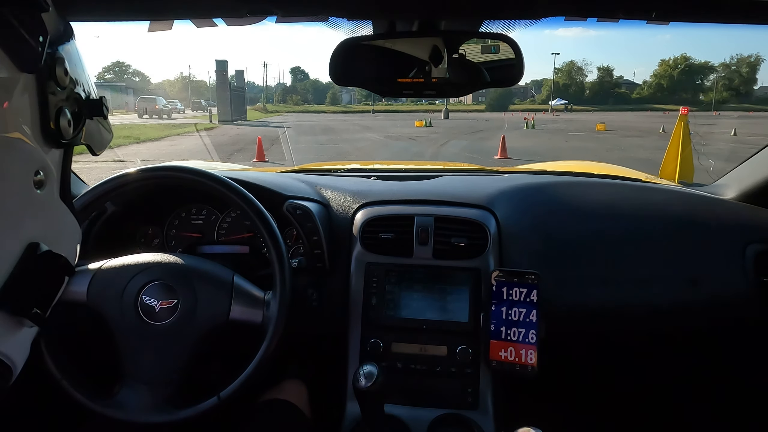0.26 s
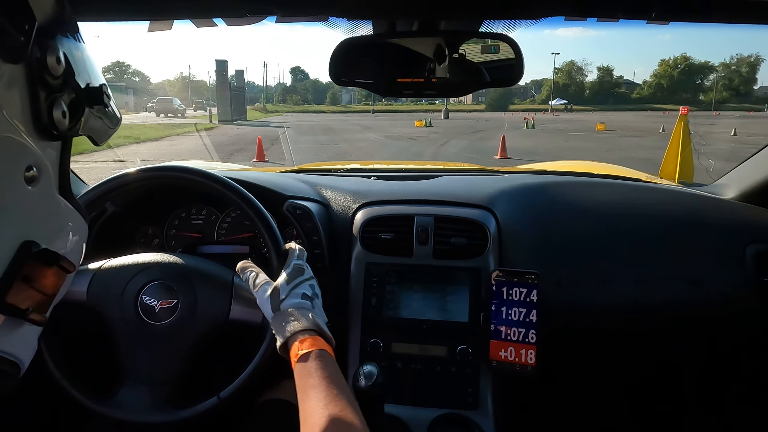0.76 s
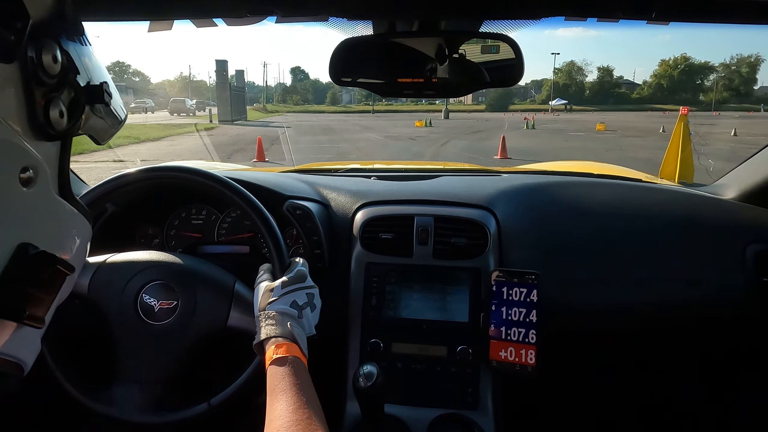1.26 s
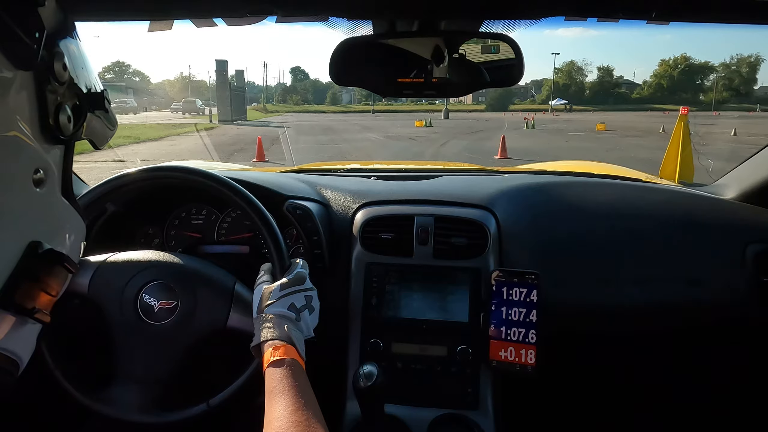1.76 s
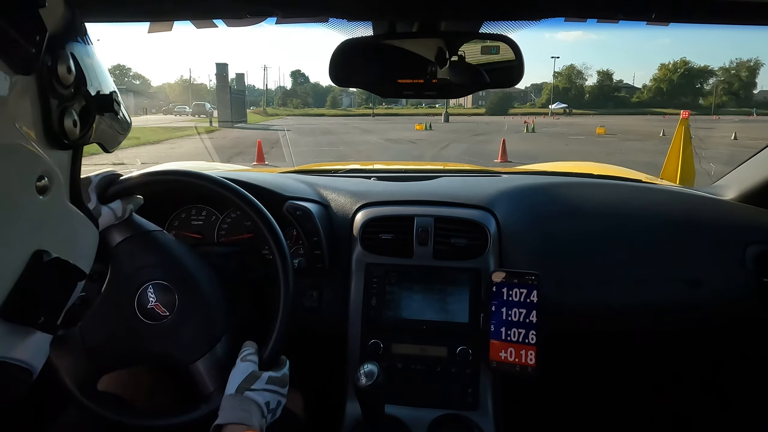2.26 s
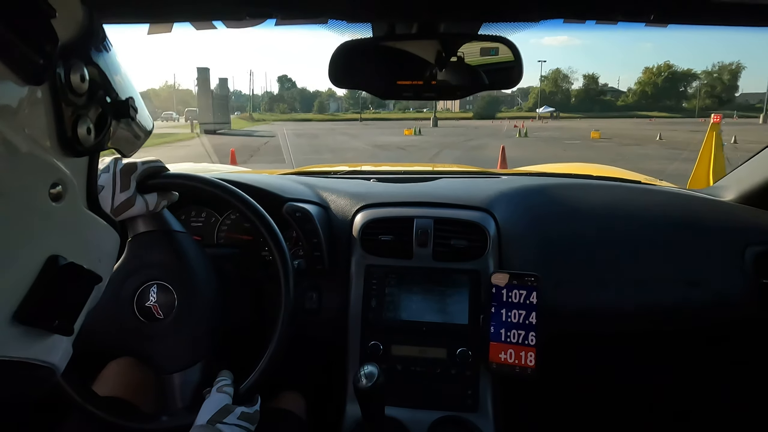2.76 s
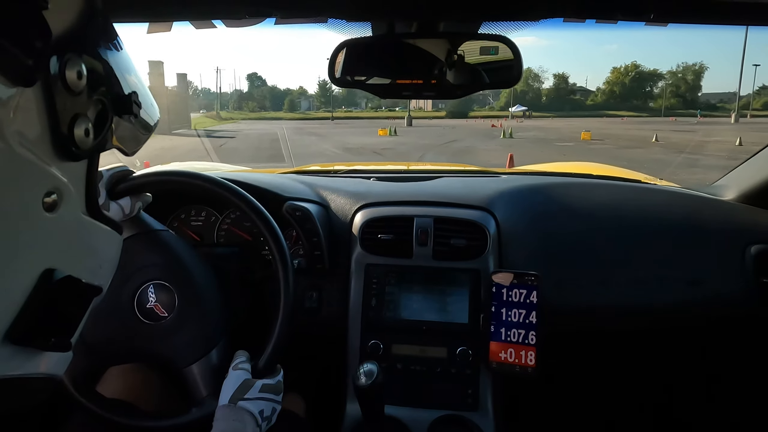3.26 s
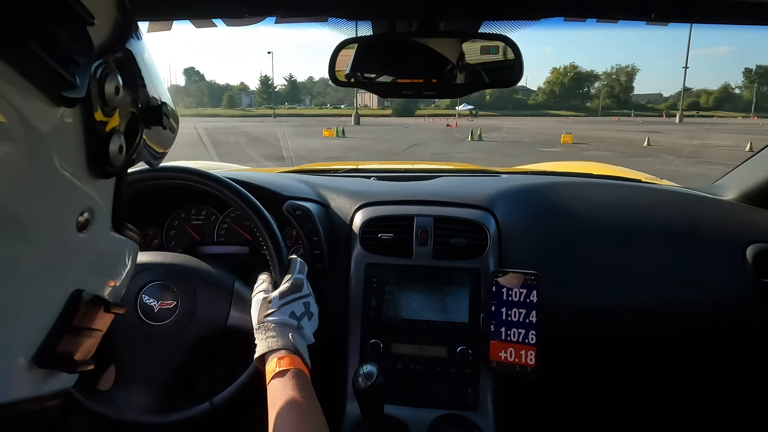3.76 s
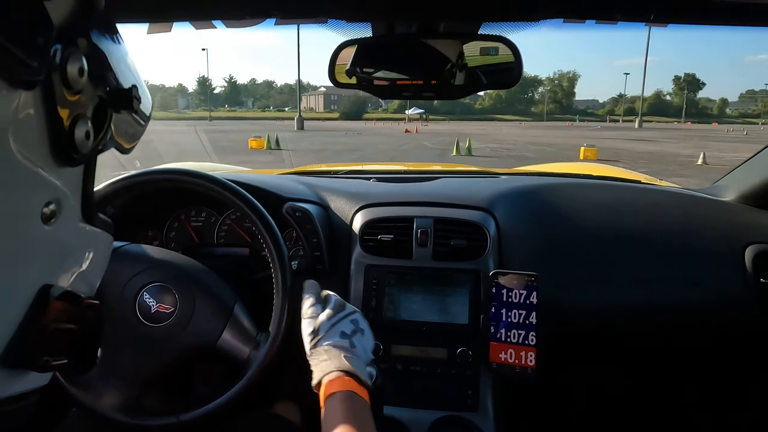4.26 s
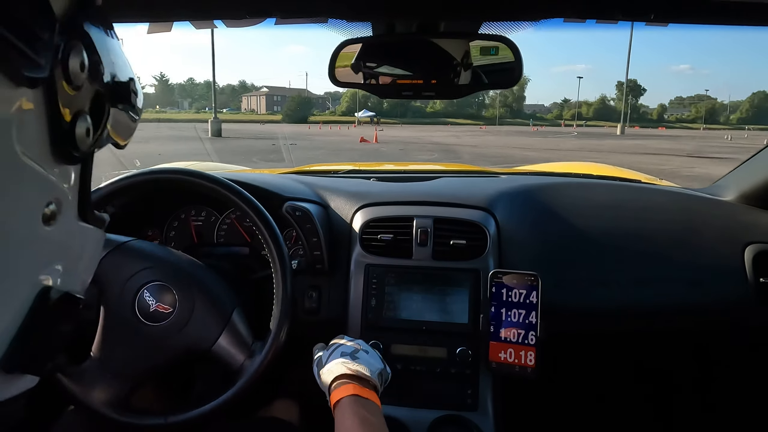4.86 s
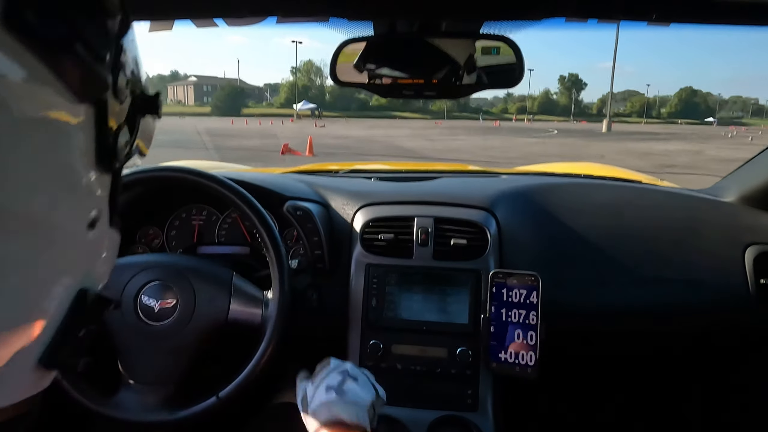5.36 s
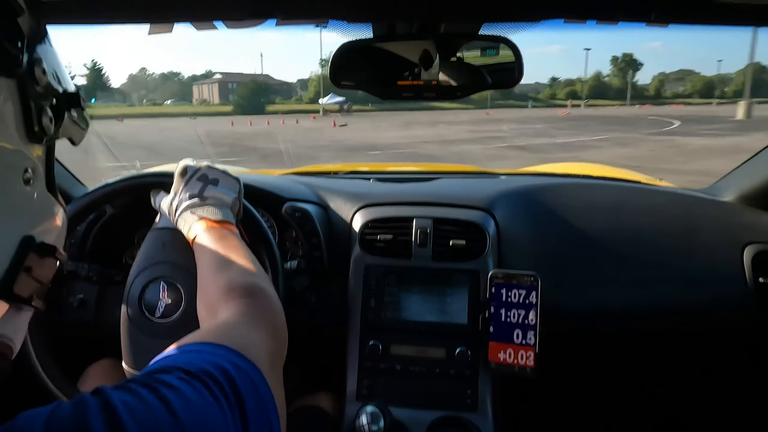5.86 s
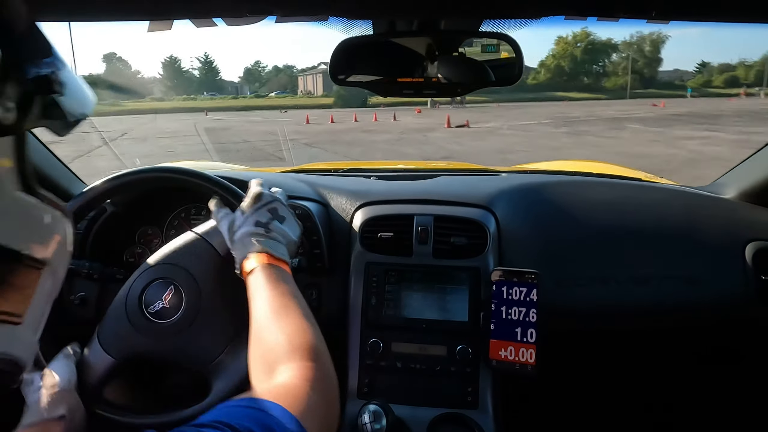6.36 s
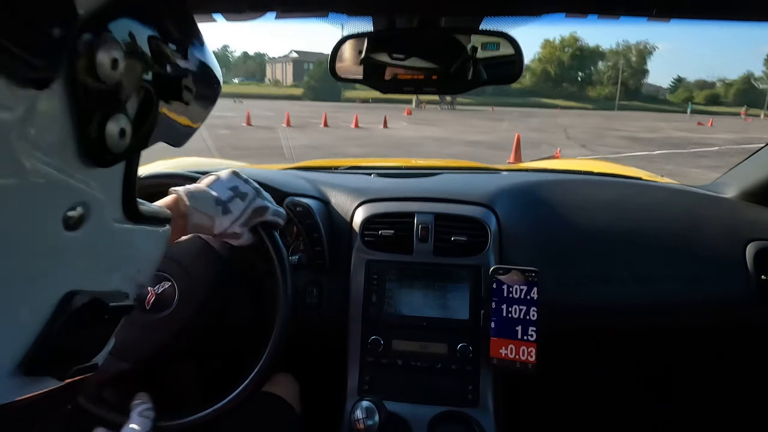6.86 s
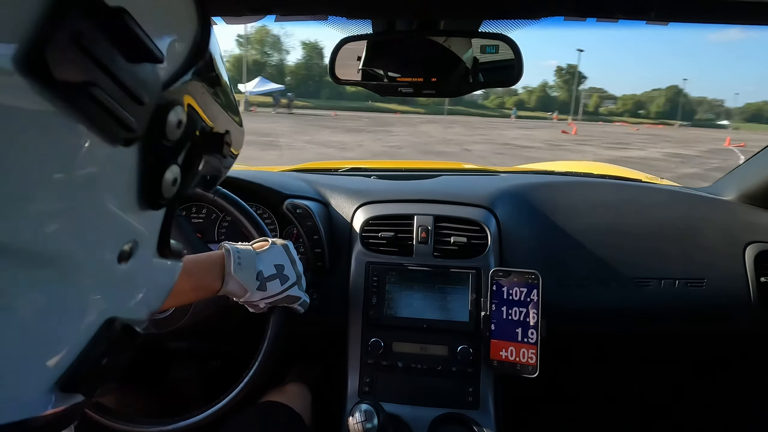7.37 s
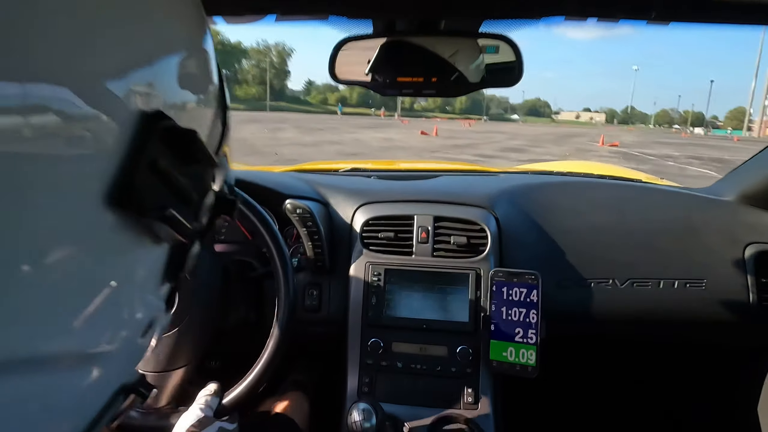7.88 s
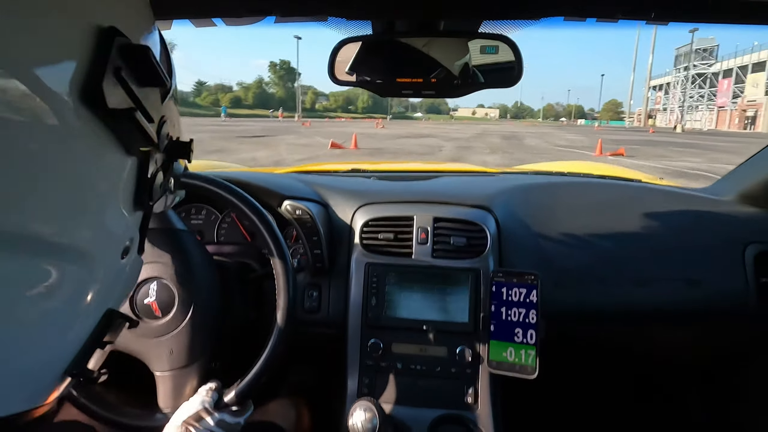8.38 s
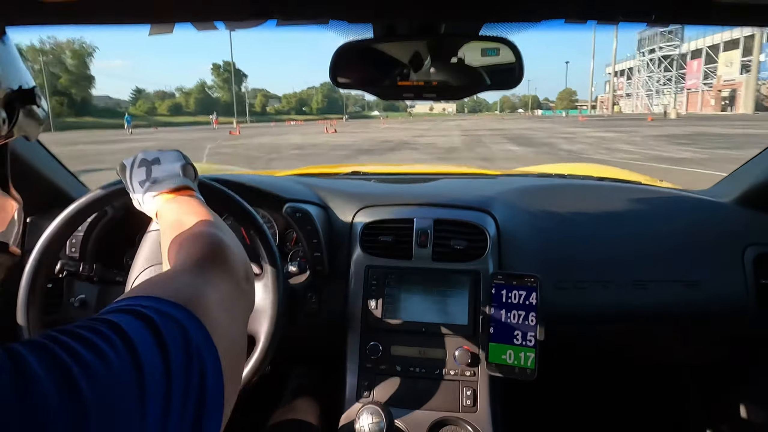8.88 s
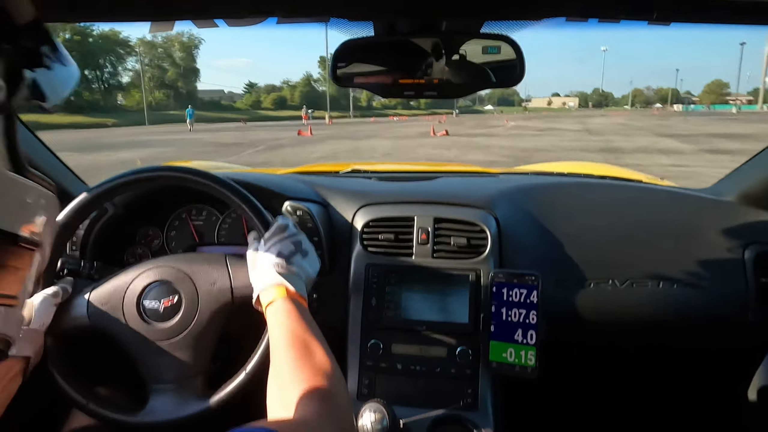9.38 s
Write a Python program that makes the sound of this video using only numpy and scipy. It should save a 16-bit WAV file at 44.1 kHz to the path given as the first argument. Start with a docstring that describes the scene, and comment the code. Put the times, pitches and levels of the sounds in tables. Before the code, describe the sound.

Heard from the driver's seat with the windows down, a V8 sports car holds steady revs, then launches. The engine bogs briefly, the tyres scrub and chirp, and the revs climb with a booming exhaust and rasping intake. The throttle snaps shut and the car coasts through a turn with thuds, ticking trim and a short squeal. The tyres scrub again as the engine pulls once more. Wind buffets the microphone throughout.

```python
"""A V8 sports car on an autocross course; stereo microphone at the driver's seat, windows down.
Wind buffets it throughout. The engine is held at launch speed until the clutch bites at 2.1 s: the
revs bog, the tyres scrub, then chirp as the car pulls up through first gear, exhaust booming and
intake rasping. At 5.4 s the throttle snaps shut and the car coasts through a turn, with chassis jolts,
ticking trim and a brief squeal. From 7.4 s the tyres scrub again and the engine pulls once more."""
import sys
import numpy as np
from scipy.fft import rfft, irfft, next_fast_len
from scipy.io import wavfile
from scipy.ndimage import map_coordinates

SR = 44100
rng = np.random.default_rng(int(sys.argv[2]) if len(sys.argv) > 2 else 0)


def dump(signal):
    """Clip the signal to [-1, 1] and save it as 16-bit WAV at the path in sys.argv[1]."""
    limited = np.clip(np.atleast_2d(signal).T, -1, 1)
    pcm = np.round(limited * 32767).astype(np.int16)
    wavfile.write(sys.argv[1], SR, pcm)


N = 424683
TIME_S = np.arange(N) / SR
LAUNCH_S = 2.14  # the clutch bites


def amp(db):
    """Decibels to gain."""
    return 10 ** (np.asarray(db) / 20)


def unit(x):
    """Scaled to rms 1."""
    return x / np.sqrt(np.mean(x ** 2) + 1e-20)


def along(points, hz):
    """Read (frequency_hz, value) points on a log axis."""
    knots_hz, values = np.transpose(points)
    return np.interp(np.log(hz + 1), np.log(knots_hz + 1), values)


def curve(points):
    """Join (time_s, value) points into one value per sample."""
    return np.interp(TIME_S, *np.transpose(points))


def wobble(rate_hz):
    """A smooth random curve, rate_hz knots a second."""
    knots = rng.standard_normal(int(N * rate_hz / SR) + 4)
    return map_coordinates(knots, [TIME_S * rate_hz])


def noise():
    """Two unrelated white noises."""
    return rng.standard_normal((2, N))


def filtered(x, response):
    """x times a response of frequency."""
    size = next_fast_len(N + SR // 4)
    return irfft(rfft(x, size) * response(np.fft.rfftfreq(size, 1 / SR)), size)[..., :N]


def coloured(x, spectrum, modes=()):
    """x through a broad spectrum with resonant humps, at rms 1."""
    def response(hz):
        humps_db = sum(db * np.exp(-.5 * ((hz - centre) / width) ** 2) for centre, width, db in modes)
        return amp(along(spectrum, hz) + humps_db)
    return unit(filtered(x, response))


def swells(rows, attack_s, fall_db_per_s):
    """An envelope: each row rises, holds to the end of its length and dies away."""
    envelope = np.zeros(N)
    for start_s, length_s, level_db in rows:
        rise = np.clip((TIME_S - start_s) / attack_s, 0, 1)
        envelope += rise * amp(level_db - fall_db_per_s * np.maximum(TIME_S - start_s - length_s, 0))
    return envelope


def knocks(rows, attack_s):
    """An envelope: each row jumps up and dies away at once."""
    envelope = np.zeros(N)
    for start_s, level_db, t60_s in rows:
        age_s = np.maximum(TIME_S - start_s, 0)
        envelope += amp(level_db - 60 * np.minimum(age_s / t60_s, 2)) * (1 - np.exp(-age_s / attack_s))
    return envelope


def since_launch(ramp_s=.43):
    """0 at the start line, 1 from ramp_s after the clutch bites; by default, once the car rolls."""
    return np.clip((TIME_S - LAUNCH_S) / ramp_s, 0, 1)


def whine(pitch_hz=1405, level_db=-46, drift=.0097, waver_db=3):
    """A faint wavering whine from up ahead, under the bonnet."""
    wavering_hz = pitch_hz * (1 + drift * (wobble(1.7) + .5 * wobble(60)))
    return amp(level_db + waver_db * wobble(11)) * np.sin(2 * np.pi * np.cumsum(wavering_hz) / SR)


# Spectrum of wind right on the microphone: frequency_hz, gain_db
WIND_SPECTRUM = [(4, -6), (10, 0), (25, -3), (50, -9), (100, -18), (200, -29), (400, -45), (1000, -80)]

def wind(standing_db=-21, moving_db=-20, gust_db=2.5, opposed=.11):
    """Eddies from the open windows hit each microphone port separately, partly in opposite sense."""
    level_db = standing_db + (moving_db - standing_db) * since_launch()
    eddies = amp(gust_db * np.array([wobble(11), wobble(14)])) * coloured(noise(), WIND_SPECTRUM)
    return amp(level_db) * unit(eddies - opposed * eddies[::-1])


# Spectrum of the engine bay, from the seat at the start line: frequency_hz, gain_db
BAY_SPECTRUM = [(130, -38), (220, -4), (293, -6), (357, -9), (404, -4.5), (458, -17.5), (483, -9),
                (667, -5), (1010, -10), (1410, -6.5), (1720, -11.5), (1980, -18.5), (2370, -14),
                (8450, -36), (15800, -51.5)]
# Spectrum of the tyres rolling below the cabin: frequency_hz, gain_db
ROLLING_SPECTRUM = [(80, -36), (160, -17), (260, -16), (350, -14), (500, -14), (750, -11.5), (1470, -13.5),
                    (2000, -21), (3500, -26), (5000, -37.5), (9000, -46), (15800, -58)]
# Resonances of the cabin around the microphone: centre_hz, width_hz, lift_db
CABIN_MODES = [(670, 38, 6.1), (898, 53, 2.8), (1390, 35, 2.8), (1713, 14, 6), (2250, 110, 0.92)]

def bay_and_tyre_roar(breath, throttle, bay_db=-34.5, tyre_db=-33.5, load_db=5.5, clatter=.17):
    """Engine-bay clatter gives way to tyre roar as the car moves off; both ring the cabin."""
    bay = amp(bay_db) * coloured(noise() * (1 + clatter * breath), BAY_SPECTRUM, CABIN_MODES)
    tyres = coloured(noise(), ROLLING_SPECTRUM, CABIN_MODES) * amp(tyre_db + 1.4 * wobble(14))
    load = np.minimum(throttle / .41, 1)  # no louder beyond part throttle
    moving = since_launch()
    return amp(load_db * load) * (np.sqrt(1 - moving) * bay + np.sqrt(moving) * tyres)


# Ticks of loose trim, close by in the cabin: start_s, level_db, t60_s
TRIM_TICKS = [(6.085, -47, 0.09), (6.12, -39, .08), (6.15, -46, 0.089), (6.425, -39, 0.13), (6.5, -40, 0.1),
              (6.64, -34, .09), (6.675, -38, 0.13), (6.708, -36, 0.15), (6.78, -43, 0.14), (7.06, -48, .08),
              (7.312, -31.5, 0.066), (7.455, -43, 0.069)]
# Spectrum of a tick: frequency_hz, gain_db
TICK_SPECTRUM = [(2000, 10), (5500, 3), (8000, -2), (11000, -1), (15000, -6)]

def trim_ticks():
    """Loose trim rattles in the turn."""
    return knocks(TRIM_TICKS, attack_s=.002) * coloured(noise(), TICK_SPECTRUM)


# Jolts from under the seat: start_s, level_db, t60_s
CHASSIS_JOLTS = [(5.43, -18, .2), (5.68, -14, .2), (6.02, -19, .3), (6.705, -5, 0.29), (7.28, -13.5, 0.34)]
# Spectrum of a jolt: frequency_hz, gain_db
JOLT_SPECTRUM = [(10, 2), (25, 5.5), (45, -6), (90, -19), (200, -17.5), (400, -26), (1200, -70)]

def chassis_jolts():
    """The chassis thuds on the lift and over seams in the course."""
    return knocks(CHASSIS_JOLTS, attack_s=.0033) * coloured(noise(), JOLT_SPECTRUM)


# Slips of the driven tyres, outside the cabin: start_s, length_s, level_db
TYRE_SCRUBS = [(2.21, 0.61, -23), (7.48, 0.41, -22.5)]
# Spectrum of slipping tread: frequency_hz, gain_db
SCRUB_SPECTRUM = [(100, -2.5), (220, 6.5), (330, -3.5), (470, -8.5), (650, 0.5), (950, 1), (1500, -1.5),
                  (2000, -29), (2600, -8.5), (4000, -13), (5000, -22), (12000, -42)]

def tyre_scrub(grit_db=2.5):
    """Tread grinds over the asphalt as the power comes in."""
    envelope = swells(TYRE_SCRUBS, attack_s=.12, fall_db_per_s=74)
    return envelope * amp(grit_db * wobble(250)) * coloured(noise(), SCRUB_SPECTRUM)


# Squeals through the open windows: start_s, length_s, start_hz, end_hz, level_db, octave_db, roughness
TYRE_SQUEALS = [(3.002, .032, 2170, 2090, -14.5, -24, .18), (3.068, .025, 2560, 2680, -27, -24, .5),
                (6.84, .135, 1305, 1260, -27, -17, .9), (6.914, .032, 1275, 1275, -22, -17, .5)]

def tyre_squeals(stray=.08, stutter_db=3.5):
    """Tread sticks and slips at an unsteady pitch."""
    out = np.zeros(N)
    drift, stutter = wobble(420), wobble(200)
    for start_s, length_s, start_hz, end_hz, level_db, octave_db, roughness in TYRE_SQUEALS:
        progress = np.clip((TIME_S - start_s) / length_s, 0, 1)
        pitch_hz = (start_hz + (end_hz - start_hz) * progress) * (1 + stray * roughness * drift)
        phase = 2 * np.pi * np.cumsum(pitch_hz) / SR
        tone = np.sin(phase) + amp(octave_db) * np.sin(2 * phase)
        swell = np.sqrt(2 * np.abs(np.sin(np.pi * progress)))
        out += amp(level_db + stutter_db * roughness * stutter) * swell * tone
    return out


# Resonances of the shut intake, ahead of the seat: centre_hz, width_hz, lift_db
SHUT_INTAKE_MODES = [(690, 55, 19.5), (1666, 32, 11.5), (2820, 320, 4.5)]
# Spells of chatter at the throttle: start_s, length_s, level_db
THROTTLE_FLUTTERS = [(5.35, 0.086, -26.5), (5.53, 0.15, -23.5)]
# Spectrum of the chatter: frequency_hz, gain_db
FLUTTER_SPECTRUM = [(300, -6), (560, -13), (1300, -5), (2700, -13), (4000, -16), (6000, -32), (15000, -54)]

def throttle_flutter(breath, rough_db=1.3):
    """On the lift, trapped air chatters against the shut throttle."""
    envelope = swells(THROTTLE_FLUTTERS, attack_s=.072, fall_db_per_s=150) * amp(rough_db * wobble(160))
    return envelope * coloured(noise() * breath, FLUTTER_SPECTRUM, SHUT_INTAKE_MODES)


# Snaps from under the bonnet after the lift: start_s, level_db, t60_s
OVERRUN_SNAPS = [(5.387, -22, 0.013), (5.427, -18, 0.018), (5.506, -6, 0.012), (5.514, -15, 0.038),
                 (5.679, -23, .012), (5.778, -28, .015), (6.557, -30, 0.026)]
# Spectrum of a snap: frequency_hz, gain_db
SNAP_SPECTRUM = [(300, -15), (700, -2), (2200, 4), (2900, 2), (4500, -4), (5600, -6), (8000, -18),
                 (15000, -34)]

def overrun_snaps():
    """Sharp knocks on the overrun ring the shut intake."""
    return knocks(OVERRUN_SNAPS, attack_s=.00066) * coloured(noise(), SNAP_SPECTRUM, SHUT_INTAKE_MODES)


# Each cylinder's gulp of air, in firing order: strength_db, runner_lag_s
CYLINDERS = [(4, 0.0025), (-5, 0), (-4.5, 0), (-5.5, 0), (2, 0.0025), (-13, 0), (-7, 0.001), (-3, 0)]

def gulps(cycle, firing_hz, fade_per_stroke=1.8, scatter_db=1, steady_flow=.5):
    """The airflow envelope: each intake valve opens with a rush that fades; some cylinders gulp more."""
    stroke, age = np.divmod(cycle * len(CYLINDERS), 1)
    stroke = stroke.astype(int)
    strength_db, lag_s = np.array(CYLINDERS)[stroke % len(CYLINDERS)].T
    size = amp(strength_db + scatter_db * rng.standard_normal(stroke[-1] + 1)[stroke])
    age = age - lag_s * firing_hz
    return unit(steady_flow + size * np.exp(-fade_per_stroke * np.abs(age)) * (age > 0))


def valve_pulses(cycle, jitter_s=.00005, scatter_db=1):
    """One pressure pulse per valve opening, each a little early or late."""
    count = len(CYLINDERS)
    strokes = np.arange(1, int(cycle[-1] * count))
    strength_db, lag_s = np.array(CYLINDERS)[strokes % count].T
    time_error, size_error = rng.standard_normal((len(strokes), 2)).T
    times_s = np.interp(strokes / count, cycle, TIME_S) + lag_s + jitter_s * time_error
    sizes = amp(.5 * strength_db + scatter_db * size_error)
    return unit(np.bincount(np.abs(times_s * SR).astype(int), sizes, N)[:N])


def ducted(x, smear_rad=3, knot_hz=260):
    """The duct holds some frequencies longer than others, smearing each pulse into a short rattle."""
    knots = rng.standard_normal(int(SR / knot_hz) + 4)
    return filtered(x, lambda hz: np.exp(1j * smear_rad * map_coordinates(knots, [hz / knot_hz])))


# Spectrum of the intake rasp at the seat: frequency_hz, gain_db
RASP_SPECTRUM = [(150, -57), (300, -13.5), (400, -3.5), (490, -12.5), (620, -4.5), (1250, -1), (1480, -5.5),
                 (2200, -5.5), (3000, -3), (4000, -7.5), (4800, -26), (6500, -51), (9000, -59)]
# Airbox resonances early and late in a pull: early_hz, late_hz, width_hz, lift_db
AIRBOX_MODES = [(685, 700, 36, 7), (1000, 1020, 164, 5.5), (1748, 1914, 133, 13), (1732, 1793, 33, 4),
                (2525, 2746, 188, 5.5), (2507, 2560, 48, 4.5), (3600, 3400, 90, 0), (4350, 4450, 69, 7.5)]
# Blend from the early resonances to the late: time_s, late_share
AIRBOX_BLEND = [(2.3, 0.14), (3.7, 0.06), (4.4, 0.63), (5.2, 0.85), (7.5, 0.17), (8.0, 0.3), (8.6, 0.8),
                (9.6, 0.6)]

def airbox(air):
    """Air rings the airbox; most of its resonances sit higher late in a pull."""
    early = coloured(air, RASP_SPECTRUM, [(hz, width, db) for hz, _, width, db in AIRBOX_MODES])
    late = coloured(air, RASP_SPECTRUM, [(hz, width, db) for _, hz, width, db in AIRBOX_MODES])
    late_share = curve(AIRBOX_BLEND)
    return unit((1 - late_share) * early + late_share * late)


# Spectrum of the intake hiss at the seat: frequency_hz, gain_db
HISS_SPECTRUM = [(2500, -25), (3800, 0), (4800, -0.5), (5700, 3), (7000, -5), (9000, -12), (11000, -9.5),
                 (13000, -14.5), (15800, -27)]
MIDDLE_REVS_HZ, HIGH_REVS_HZ = 220, 296  # firing rates

def intake(cycle, firing_hz, throttle, pulse_top_hz=1700, spit_s=.001):
    """Valve pulses and turbulent gulps of air rasp and hiss under load, harder at high revs."""
    revs = np.clip((firing_hz - 215) / 115, 0, 1)
    lowpass = lambda hz: 1 / np.sqrt(1 + (hz / pulse_top_hz) ** 4)
    breath = gulps(cycle, firing_hz)
    cycle_age_s = (cycle % 1) * len(CYLINDERS) / firing_hz
    spit = np.exp(-cycle_age_s / spit_s)  # once a cycle, from the strongest cylinder
    spitting = unit(breath + 2 * revs * spit)
    turbulence = spitting * filtered(noise(), lambda hz: np.sqrt(1 - .6 * lowpass(hz) ** 2))
    pulses = amp(4 * (revs - 1)) * filtered(ducted(valve_pulses(cycle)), lowpass)
    rasp = airbox(turbulence + np.array([pulses, np.zeros(N)]))  # pulses join the direct sound only
    hiss = coloured((breath + spitting) * noise(), HISS_SPECTRUM)
    open_rasp_db = -18.5 + .008 * np.maximum(firing_hz - MIDDLE_REVS_HZ, 0)
    open_hiss_db = -37 + .0952 * np.maximum(firing_hz - 254, 0)
    return amp(open_rasp_db) * throttle ** 2.75 * rasp + amp(open_hiss_db) * throttle ** 3.7 * hiss


def engine_order(cycle, order, port_lag_rad=.81):
    """A sine at a multiple of the engine cycle, reaching the two microphone ports out of step."""
    phase = 2 * np.pi * (order * cycle + rng.random())
    return np.sqrt(2) * np.sin(phase + port_lag_rad * np.array([[.5], [-.5]]))


# Exhaust orders 1, 2, ... of the engine cycle, scaled to full throttle: held_db, middle_db, high_db
LOPE_ORDERS = [(-50, -45, -44), (-39, -32.5, -23), (-22.5, -33.5, -32), (-21, -29.5, -24.5),
               (-29, -29, -28), (-16, -31.5, -30.5), (-35, -32, -38), (-39, -53, -48), (-33, -48, -55),
               (-30, -35, -44.5), (-41, -41, -59)]

def exhaust_lope(cycle, firing_hz, throttle, waver_db=2.5, leak=.04):
    """The unevenly firing banks lope; the pattern shifts as the clutch takes up and with the revs."""
    engaged = since_launch(ramp_s=.08)
    revs = np.clip((firing_hz - MIDDLE_REVS_HZ) / (HIGH_REVS_HZ - MIDDLE_REVS_HZ), 0, 1)
    lope = 0
    for order, (held_db, middle_db, high_db) in enumerate(LOPE_ORDERS, 1):
        driving_db = middle_db + (high_db - middle_db) * revs
        level_db = (1 - engaged) * held_db + engaged * driving_db
        gain = amp(level_db + waver_db * np.array([wobble(6), wobble(6)]))
        lope += gain * engine_order(cycle, order, port_lag_rad=1)
    return (throttle + leak) ** .53 * lope


# The firing tone at the seat, under full load: firing_hz, level_db
BOOM_LEVELS = [(120, -17), (152, -15.5), (199, -18), (218, -21.5), (238, -23), (292, -19.5), (312, -22.5),
               (336, -28), (372, -26.5)]

def exhaust_boom(cycle, firing_hz, throttle, waver_db=1, leak=.015):
    """The firing tone booms and fades as it sweeps through the pipe and cabin resonances."""
    load = np.minimum(throttle / .59, 1) + leak  # all but gone on the overrun
    level_db = along(BOOM_LEVELS, firing_hz) + waver_db * wobble(20)
    return load * amp(level_db) * engine_order(cycle, len(CYLINDERS))


# Moments when the exhaust barks out: start_s, length_s, level_db
EXHAUST_BARKS = [(4.87, 0.34, -31), (7.53, 0.12, -24.5), (7.88, 0.13, -32)]

def exhaust_bark(cycle, throttle, open_db=-43, rough_db=2, step_db=4):
    """Rough harmonics 2 to 4 of the firing tone grow with the throttle and flare briefly."""
    overtones = 0
    for harmonic in (2, 3, 4):
        gain = amp(rough_db * wobble(70) - step_db * (harmonic - 2))
        overtones += gain * engine_order(cycle, harmonic * len(CYLINDERS))
    flares = swells(EXHAUST_BARKS, attack_s=.091, fall_db_per_s=160)
    return (amp(open_db) * throttle ** .2 + flares) * overtones


# Reflected against direct sound at the seat: frequency_hz, side_to_mid_db
CABIN_WIDTH = [(100, -8), (300, -4.5), (1000, -8), (2000, -11.5), (4000, -9), (8000, -1), (13000, 1)]

def in_cabin(pair):
    """Direct and reflected sound to left and right: the treble is the more diffuse."""
    direct, reflected = pair
    side = filtered(reflected, lambda hz: amp(along(CABIN_WIDTH, hz)))
    return np.array([direct + side, direct - side])


# Revs held at the start line: time_s, firing_hz
HELD_REVS = [(0, 137), (.6, 141.6), (.85, 137.8), (1.5, 148.1), (1.9, 153.2), (2.25, 155.5)]
# Revs bog as the clutch bites, then climb: time_s, firing_hz
FIRST_PULL_REVS = [(2.39, 121), (2.55, 144), (2.8, 191.6), (3, 215), (3.12, 222), (3.3, 219), (3.5, 226),
                   (3.85, 264), (4.18, 270.5), (4.35, 284.7), (4.6, 313), (4.8, 312), (5, 335), (5.35, 388)]
# Revs coasting through the turn: time_s, firing_hz
COAST_REVS = [(5.41, 381.7), (6.0, 227.9), (6.35, 239), (7.0, 186.8)]
# Revs out of the turn, with flares of wheelspin: time_s, firing_hz
SECOND_PULL_REVS = [(7.4, 186.5), (7.6, 191), (7.74, 214), (7.88, 198.6), (7.97, 202), (8.1, 220),
                    (8.3, 218.4), (8.7, 244.7), (8.9, 251.8), (9.03, 269), (9.15, 299.7), (9.33, 292),
                    (9.62, 312.4)]
# The driver's throttle pedal: time_s, open_share
PEDAL = [(0, 0.19), (2.14, 0.29), (2.25, 0.6), (2.3, 0.97), (2.98, 0.94), (3.02, 0.8), (3.2, 0.75),
         (3.4, 1), (5.35, 0.92), (5.385, 0), (5.95, 0.03), (6.55, 0.22), (6.85, 0.04), (7.34, 0.08),
         (7.62, 0.75), (7.92, 0.89), (7.98, 1), (9.63, 0.94)]

def scene():
    """One crankshaft and one pedal drive the engine; tyres, knocks and wind join it at the seat."""
    firing_hz = curve([*HELD_REVS, *FIRST_PULL_REVS, *COAST_REVS, *SECOND_PULL_REVS])
    throttle = curve(PEDAL)
    cycle = np.cumsum(firing_hz * (1 + .003 * wobble(25))) / SR / len(CYLINDERS)  # engine cycles so far
    breath = gulps(cycle, firing_hz)
    airborne = intake(cycle, firing_hz, throttle) + bay_and_tyre_roar(breath, throttle)
    airborne += throttle_flutter(breath) + tyre_scrub()
    impacts = overrun_snaps() + trim_ticks() + chassis_jolts()
    exhaust = exhaust_lope(cycle, firing_hz, throttle) + exhaust_boom(cycle, firing_hz, throttle)
    exhaust += exhaust_bark(cycle, throttle)
    return in_cabin(airborne + impacts) + exhaust + whine() + tyre_squeals() + wind()


# Balance of the two microphone ports: frequency_hz, left_minus_right_db
PORT_BALANCE = [(40, 0), (120, 1), (260, -1.5), (700, -1.3), (2000, -1), (4400, 1.5), (7500, 3),
                (11000, -6), (15000, -7)]

def record(dry, ceiling=.96, top_hz=15850):
    """Each port colours the sound its own way; the recorder rounds the peaks and cuts the top treble."""
    ports = filtered(dry, lambda hz: amp(np.array([[.5], [-.5]]) * along(PORT_BALANCE, hz)))
    rounded = ports / (1 + np.abs(ports / ceiling) ** 6) ** (1 / 6)
    return filtered(rounded, lambda hz: hz < top_hz)


dry = scene()
out = record(dry)
dump(out)
```